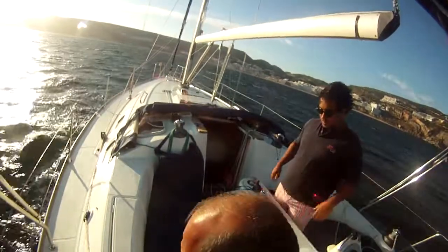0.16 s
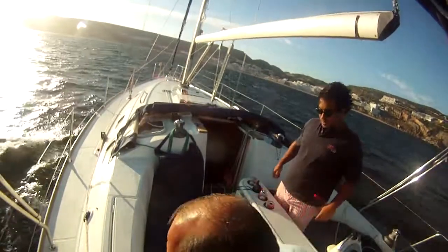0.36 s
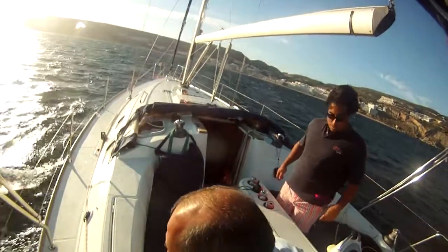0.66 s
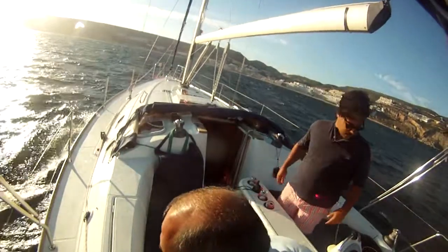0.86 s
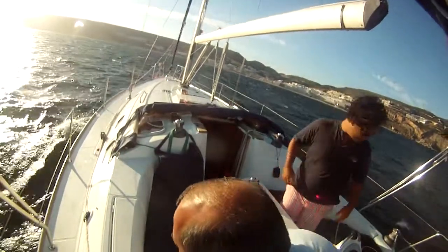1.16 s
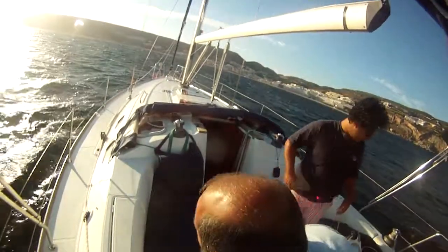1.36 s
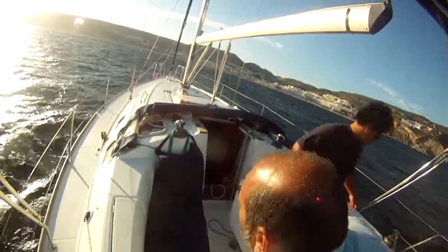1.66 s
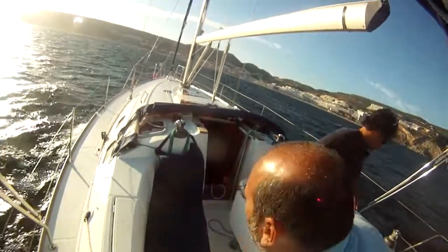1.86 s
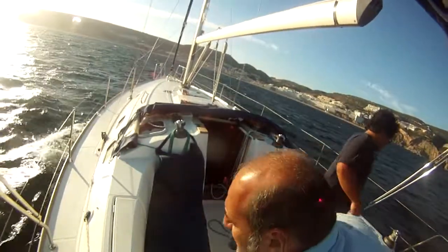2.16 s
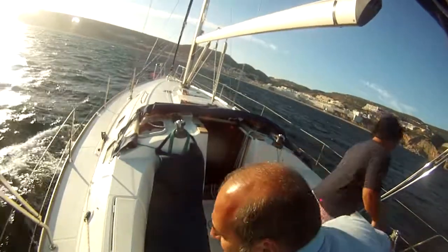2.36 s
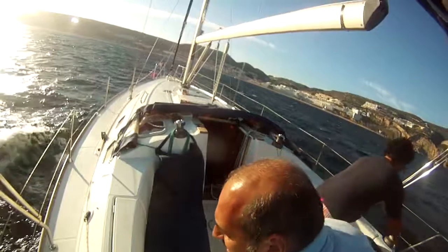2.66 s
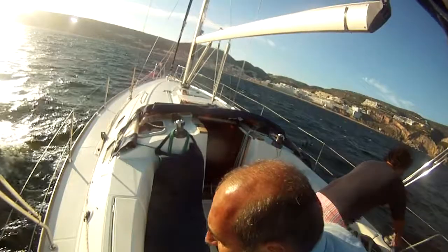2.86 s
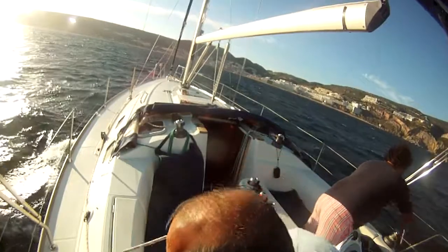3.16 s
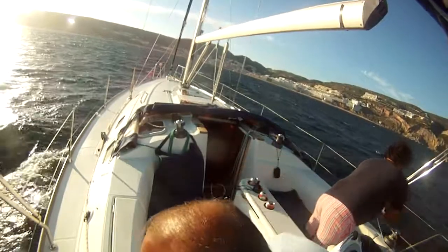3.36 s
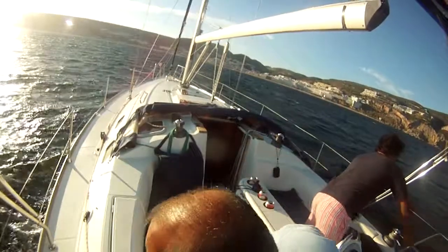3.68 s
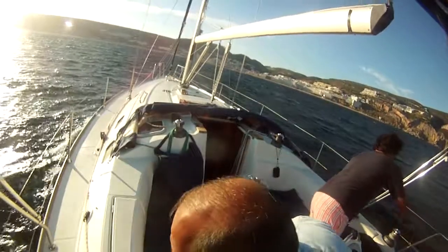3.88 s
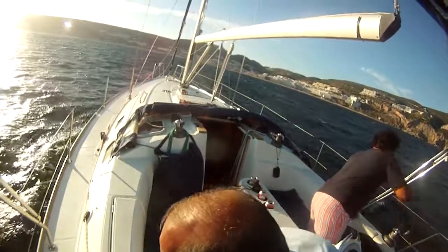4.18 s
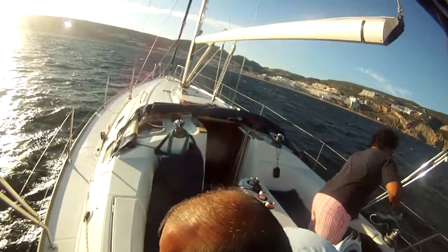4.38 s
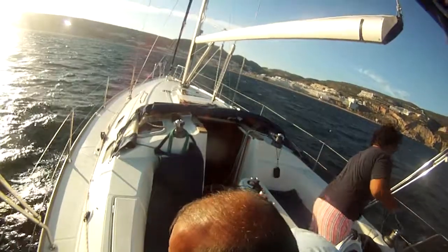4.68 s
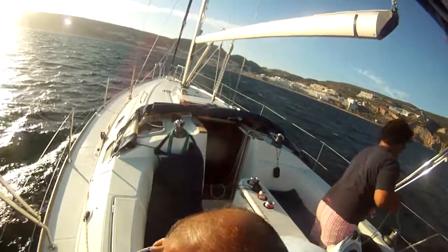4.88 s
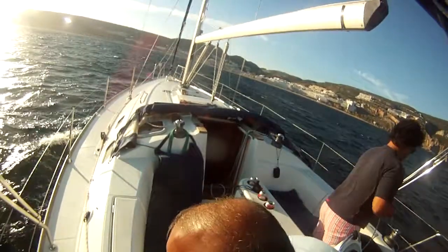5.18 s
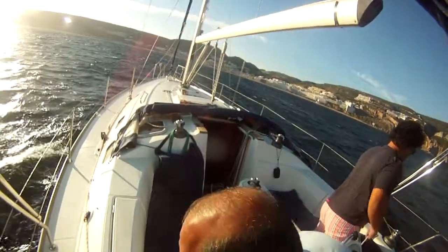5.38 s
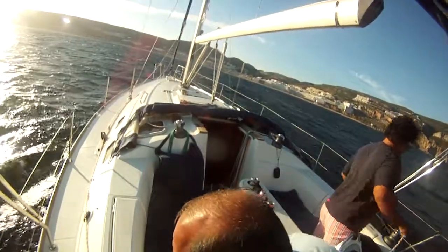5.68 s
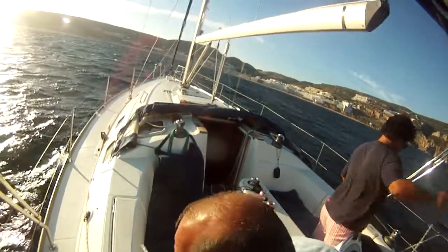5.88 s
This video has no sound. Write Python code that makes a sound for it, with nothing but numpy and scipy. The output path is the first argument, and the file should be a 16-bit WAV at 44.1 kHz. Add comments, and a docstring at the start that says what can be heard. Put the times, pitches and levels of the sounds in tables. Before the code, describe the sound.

A boat's diesel engine runs for the whole six seconds with a loud, low hum and rumble. The hull drones along in slow pulses, and from about 2 seconds the propeller adds a stronger throbbing beat. Small waves wash along the side, with soft hissing splashes near the start and more often from 4.7 seconds on. A loose fitting buzzes and rattles thinly underneath, giving dull little knocks at about 2, 3.1, 5.2 and 5.8 seconds. From 1.6 to 2 seconds something scrapes with a ringing rasp and thin, high squeaks. Around 3.5 seconds deck gear gives a sharp, loud double snap surrounded by lighter clicks, and one more small snap follows near 4.9 seconds. Everything is heard close, from the open cockpit, through a microphone in a hard case that makes it slightly boxy, with a faint metallic edge in the treble.

```python
"""In the cockpit of a sailing yacht that motors through small, choppy waves.
A three-cylinder diesel hums and beats against the propeller blades, and churned water makes the hull
drone. Waves wash past and a loose fitting buzzes. Something scrapes briefly and deck gear snaps.
It is all heard by a camera in a hard case: the case rings, and the camera's slow sampling
mirrors the sound into the treble."""
import sys
import numpy as np
from scipy import signal
from scipy.fft import rfft, irfft, next_fast_len
from scipy.io import wavfile
from scipy.ndimage import map_coordinates

SR = 44100
rng = np.random.default_rng(int(sys.argv[2]) if len(sys.argv) > 2 else 0)


def put_to_file(sound):
    """Save the sound as 16-bit audio at rate SR, in the file named by the first command-line argument."""
    columns = np.atleast_2d(sound).T  # one column per channel
    safe = np.clip(columns, -1, 1)
    whole_steps = np.round(safe * 32767)
    wavfile.write(sys.argv[1], SR, whole_steps.astype(np.int16))


N = 265923

# how the boat is driven: (time [s], engine speed [turns/s], propeller speed [turns/s], blade thump [dB])
DRIVE = [(0.0, 38, 15.5, -43), (0.75, 38.9, 16.3, -38.5), (1.5, 38.5, 16.2, -36.5),
         (2.25, 39.5, 16.1, -24.5), (3.0, 37.6, 17.7, -24), (3.75, 37.2, 17.3, -21.5),
         (4.5, 38.26, 16.27, -28.5), (5.25, 39.9, 15.5, -24), (6.0, 36.4, 17.9, -28.5)]
# engine hum; the cylinders fire 1.5 times a turn: (pitch [times engine speed], level [dB])
ENGINE_TONES = [(1, -30), (1.5, -17)]
# the three blades: (pitch [times propeller speed], level against the blade thump [dB])
BLADE_TONES = [(3, -1.5), (6, -24.5)]
# engine tones in the hull: (pitch [times engine speed], level against the churning [dB])
HULL_TONES = [(5, -7.5), (5.5, -11.5)]
# slow rise and fall of the hull drone and of the water: (time [s], relative level [dB])
DRONE_LEVEL = [(0.0, -20.5), (1.27, -22.0), (2.48, -16.5), (2.55, -23), (2.85, -20), (3.15, -26),
               (3.6, -17.5), (3.75, -26), (3.9, -19.5), (4.35, -23.5), (4.65, -20.5), (6.0, -20.5)]
WASH_LEVEL = [(0.0, -35.5), (1.43, -38.5), (1.65, -33.5), (2.17, -32), (2.4, -32.5), (2.48, -35),
              (2.62, -32.3), (2.92, -33.5), (3.0, -37), (3.38, -33.5), (3.83, -36), (3.98, -33.5),
              (4.12, -37.5), (4.58, -38), (4.65, -32.5), (5.03, -36.5), (6.0, -32.1)]
# small waves breaking on the hull: (time of the crest [s], level [dB], length [s])
SPLASHES = [(0.277, -42.5, 0.29), (0.663, -41.5, 0.14), (2.35, -45, .2), (2.7, -42, 0.21),
            (3.62, -41.5, 0.33), (4.18, -44.5, 0.26), (4.786, -37.5, .3), (5.0, -41, 0.17),
            (5.24, -38, .14), (5.55, -38, 0.26), (5.98, -40, 0.41)]
# sharp snaps of deck gear, dull knocks of the fitting: (time [s], level [dB], time to fade 60 dB [s])
SNAPS = [(3.354, -24.5, 0.04), (3.391, -30, 0.027), (3.4572, -9, 0.051), (3.4675, -8.2, 0.04),
         (3.477, -28.5, 0.024), (3.521, -31, .03), (4.853, -25.5, 0.047)]
KNOCKS = [(2.023, -23, 0.064), (3.111, -22.5, 0.03), (5.201, -22, 0.066), (5.764, -23.5, 0.15)]

# how each noise is spread from bass to treble: (frequency [Hz], relative level [dB])
DRONE_COLOUR = [(40, -23.5), (100, -5), (150, 4), (210, -1), (280, -7.5), (420, -23.5), (900, -33),
                (2500, -66)]
RUMBLE_COLOUR = [(10, -36.5), (25, -25), (40, -5), (62, 1), (73, -6.5), (86, -12), (110, -19), (200, -9),
                 (400, -65.5)]
SNAP_COLOUR = [(300, -27), (780, -23), (950, -9.5), (1400, -15), (1750, -5), (2250, 1), (2900, -19),
               (3650, -5.5), (4100, -13), (4600, -19.5), (6000, -33)]
SCRAPE_COLOUR = [(400, -25), (950, -4.5), (1300, -11), (1500, -13), (1750, -17), (2150, 0.5), (2450, -6.5),
                 (2900, -16), (3600, -15.5), (4500, -21.5), (6000, -22.5)]
SQUEAK_COLOUR = [(1000, -28.0), (5000, -11)]
WASH_COLOUR = [(100, -26.5), (280, 0), (450, -1.5), (850, -4), (1300, -11.5), (2000, -19), (3000, -37),
               (6000, -73.5)]
SPRAY_COLOUR = [(400, -23.5), (1000, -4.5), (1600, -3.5), (2550, -0.5), (2900, -13), (3400, -8.5),
                (4300, -17.5), (5200, -18.5), (6000, -31)]
BUZZ_COLOUR = [(400, -28.5), (850, -19.5), (990, -2), (1150, -15), (1600, -20.5), (2120, -15),
               (2600, -26.5), (5000, -43)]
RATTLE_COLOUR = [(1500, -27.5), (2100, -1.5), (2800, -24.5)]
# the pitches at which each thing rings: (frequency [Hz], width [Hz], boost [dB])
HULL_RING = [(142, 30, 6.5), (187.1, 37.5, 25), (240.7, 20, 7), (328.3, 34, 10), (538.7, 153, 16),
             (697, 46, 10), (755, 36, 4)]
CASE_RING = [(989, 117, 11.5), (1238, 120, 5), (2126, 160, 8.5), (2657, 94, 9), (3737, 153, 8.5)]
GEAR_RING = [(1045, 210, 5.5), (2180, 117, 11.5), (3730, 150, 3)]
SCRAPE_RING = [(2021, 73, 19), (3640, 56, 5), (4090, 150, 13.5)]
SQUEAK_RING = [(5296, 130, 33)]
RATTLE_RING = [(2093, 136, 20.5)]

FIRINGS_PER_TURN, BLADES = 1.5, 3
SCRAPE_START_S, SCRAPE_END_S, SLIPS_PER_S = 1.625, 2.01, 47


def engine(engine_turns):
    """The diesel hums: one tone from its turning shaft, a louder one from its firing cylinders."""
    return tones(engine_turns, ENGINE_TONES, waver_db=0)


def propeller(propeller_turns, thump_db):
    """The blades thump at nearly the engine's firing rate, so the two sounds beat together."""
    return amp(thump_db) * tones(propeller_turns, BLADE_TONES, waver_db=2)


def hull_drone(engine_turns, propeller_turns):
    """Water churned by the propeller shakes the hull panels, which also hum with the engine."""
    blade_passes = BLADES * propeller_turns
    firings = FIRINGS_PER_TURN * engine_turns
    churn = bursts(propeller_turns, sharpness=0.39) * np.exp(0.4 * np.cos(2 * np.pi * blade_passes))
    drone = unit(colour(churn, DRONE_COLOUR, HULL_RING))
    drone += tones(engine_turns, HULL_TONES, waver_db=1.5)
    level_db = curves(DRONE_LEVEL)[0] - 3.4 + throb() + 1.88 * wobble(15)
    beat_db = 2.07 * np.cos(2 * np.pi * (firings - blade_passes))  # they drift in and out of step
    return amp(level_db + beat_db) * steady(drone, span_s=0.28)


def throb(rate_hz=0.97, deep_dip_s=0.91):
    """The drone's slow pulse, in dB: a deep dip every cycle and a shallow one halfway."""
    phase = 2 * np.pi * rate_hz * (np.arange(N) / SR - deep_dip_s)
    return -1.83 * np.cos(phase) - 1.87 * np.cos(2 * phase)


def rumble(level_db=-27):
    """A low, even noise from the machinery lies under the hum."""
    return amp(level_db) * unit(colour(rng.standard_normal(N), RUMBLE_COLOUR))


def panel_hum(propeller_turns, thump_db):
    """One hull panel hums at three times the blade rate; it grows with the thump and swells once."""
    hum = amp(-34 + 0.35 * (thump_db - thump_db.mean()) + 3 * wobble(8))
    swell = amp(-24) * fade(start_s=0.24, end_s=0.74, rise_s=0.14, fall_s=0.14)
    tone = np.sqrt(2) * np.sin(2 * np.pi * 3 * BLADES * propeller_turns)
    return np.hypot(hum, swell) * tone


def gear_snaps():
    """Hard hits make the deck gear and the camera case ring for an instant."""
    return hits(SNAPS, SNAP_COLOUR, CASE_RING + GEAR_RING, rise_s=0.00095)


def scrape(level_db=-32):
    """Something sticks and slips in quick, uneven jerks, making a ringing rasp."""
    slips = unit(rng.standard_normal(N) * amp(1.5 * wobble(170)))
    rasp = steady(colour(slips, SCRAPE_COLOUR, CASE_RING + SCRAPE_RING), span_s=0.072)
    pressure = fade(SCRAPE_START_S, SCRAPE_END_S, rise_s=0.09, fall_s=0.1)
    return pressure * amp(level_db + 2.5 * wobble(SLIPS_PER_S)) * rasp


def squeaks(level_db=-40.5, spread_db=6.5, fade_s=0.071):
    """During the scrape, slips set off thin chirps, uneven in timing and size."""
    chirps = []
    for time_s in np.arange(SCRAPE_START_S, SCRAPE_END_S - 0.025, 1 / SLIPS_PER_S):
        late, size = rng.uniform(-1, 1, 2)
        chirps.append((time_s + 0.39 * late / SLIPS_PER_S, level_db + spread_db * size, fade_s))
    return hits(chirps, SQUEAK_COLOUR, SQUEAK_RING, rise_s=0.003)


def wash(wash_db):
    """The bow wave rushes along the hull, loudest when the boat leans into a wave."""
    water = drops(per_s=200, spread_db=6.5, strength=0.52)
    rush = unit(colour(water, WASH_COLOUR, HULL_RING + CASE_RING))
    return amp(wash_db - 3 + 2 * wobble(16)) * rush


def spray(surge_db):
    """Water breaks into a hiss of drops that grows a little with the wash and flares at each splash."""
    water = drops(per_s=350, spread_db=5, strength=0.63)
    hiss = unit(colour(water, SPRAY_COLOUR, CASE_RING))
    power = amp(-44 + 0.22 * surge_db) ** 2 + splash_power()
    return np.sqrt(power) * amp(1.63 * wobble(25)) * hiss


def splash_power(rise_share=0.48):
    """The power of the small breaking waves: each swells to its crest and drains away."""
    t, power = np.arange(N) / SR, np.zeros(N)
    for crest_s, db, length_s in SPLASHES:
        width_s = length_s * np.where(t < crest_s, rise_share, 1 - rise_share)
        power += amp(db) ** 2 * np.exp(-((t - crest_s) / width_s) ** 2)
    return power


def loose_fitting(engine_turns, surge_db):
    """A loose fitting buzzes and rattles thinly as the engine fires, and now and then it knocks."""
    firings = FIRINGS_PER_TURN * engine_turns
    buzz = steady(colour(bursts(firings, sharpness=0.3), BUZZ_COLOUR, CASE_RING), span_s=0.24)
    buzz_db = -40 + 1.22 * surge_db + 2.6 * wobble(14)
    shaking = bursts(firings, sharpness=0.83) * amp(4.7 * wobble(23.99))
    rattle = unit(colour(shaking, RATTLE_COLOUR, RATTLE_RING))
    knocks = hits(KNOCKS, BUZZ_COLOUR, CASE_RING, rise_s=0.0024)
    return amp(buzz_db) * buzz + amp(-49) * rattle + knocks


def tones(turns, rows, waver_db):
    """Tones at multiples of a shaft's speed, each wavering in level by about waver_db."""
    sound = np.zeros(N)
    for multiple, db in rows:
        gain = amp(db + waver_db * wobble(4.84))
        sound += gain * np.sqrt(2) * np.cos(2 * np.pi * (multiple * turns + rng.random()))
    return sound


def bursts(cycles, sharpness):
    """Noise that flares once a cycle."""
    return unit(rng.standard_normal(N) * np.exp(sharpness * np.cos(2 * np.pi * cycles)))


def drops(per_s, spread_db, strength):
    """Noise mixed with tiny impacts of uneven size."""
    lands = rng.random(N) < per_s / SR
    size = amp(spread_db * np.clip(rng.standard_normal(N), -2, 2)) * rng.choice([-1, 1], N)
    return rng.standard_normal(N) + strength * unit(lands * size)


def hits(rows, shape, rings, rise_s):
    """Each hit is a ringing noise that swells quickly and dies away."""
    t = np.arange(SR // 4) / SR
    loudness = np.zeros(N + len(t))
    for time_s, db, fade_s in rows:
        loudness[round(time_s * SR):][:len(t)] += (1 - np.exp(-t / rise_s)) * amp(db - 60 * t / fade_s)
    ringing = steady(colour(rng.standard_normal(N), shape, rings), span_s=0.01)
    return loudness[:N] * ringing


def colour(noise, shape, rings=()):
    """Filter a noise with a smooth bass-to-treble shape and ringing peaks on top."""
    size = 2 * next_fast_len(N // 2 + SR // 4)
    hz = np.fft.rfftfreq(size, 1 / SR)
    shape_hz, shape_db = np.transpose(shape)
    db = np.interp(np.log(hz + 1), np.log(shape_hz), shape_db)
    db += sum(boost / (1 + (2 * (hz - centre) / width) ** 2) for centre, width, boost in rings)
    # these three lines make the filter ring after each sound, never before it
    cepstrum = irfft(np.log(unit(amp(db))))
    cepstrum[1:size // 2] *= 2
    cepstrum[size // 2 + 1:] = 0
    running = np.pad(noise, (size - N, 0), "wrap")  # already ringing at time zero
    return irfft(rfft(running) * np.exp(rfft(cepstrum)))[-N:]


def steady(x, span_s):
    """Even out the level over span_s seconds, keeping the faster flutter."""
    window = signal.windows.hann(int(span_s * SR))
    padded = np.pad(x ** 2, len(window), "reflect")
    power = signal.fftconvolve(padded, window / window.sum(), "same")[len(window):][:N]
    return x / np.sqrt(np.abs(power) + 1e-12)


def fade(start_s, end_s, rise_s, fall_s):
    """A volume curve that rises, holds at 1 and falls."""
    t = np.arange(N) / SR
    return np.clip(np.minimum((t - start_s) / rise_s, (end_s - t) / fall_s), 0, 1)


def wobble(per_s):
    """A smooth curve through per_s random values a second."""
    points = rng.standard_normal(int(N * per_s / SR) + 4)
    return map_coordinates(points, [np.arange(N) * per_s / SR])


def curves(rows):
    """Turn each table column after the time into one value per sample."""
    times, *columns = np.transpose(rows)
    return [np.interp(np.arange(N) / SR, times, column) for column in columns]


def amp(db):
    """Turn decibels into a gain."""
    return 10 ** (np.asarray(db) / 20)


def unit(x):
    """Scale to an average power of 1."""
    return x / np.sqrt(np.mean(x ** 2) + 1e-20)


def scene():
    """Engine and propeller shake the boat; the spray and the buzz rise and fall with the wash."""
    engine_hz, propeller_hz, thump_db = curves(DRIVE)
    engine_turns = np.cumsum(engine_hz) / SR
    propeller_turns = np.cumsum(propeller_hz) / SR
    wash_db, = curves(WASH_LEVEL)
    surge_db = wash_db - wash_db.mean()  # how far the wash is above its average
    machinery = engine(engine_turns) + propeller(propeller_turns, thump_db) + rumble()
    hull = hull_drone(engine_turns, propeller_turns) + panel_hum(propeller_turns, thump_db)
    deck = gear_snaps() + scrape() + squeaks()
    sea = wash(wash_db) + spray(surge_db)
    return (machinery + hull + deck + sea + loose_fitting(engine_turns, surge_db))[None]


def record(dry, cutoff_hz=5800, hold_hz=12000, top_hz=15300):
    """The camera samples slowly and holds each value, which mirrors the sound around hold_hz."""
    margin, size = SR // 8, 2 * next_fast_len(N // 2 + SR // 4)
    hz = np.fft.rfftfreq(size, 1 / SR)
    padded = np.pad(dry[0], margin, "reflect", reflect_type="odd")
    dulled = irfft(rfft(padded, size) / np.sqrt(1 + (hz / cutoff_hz) ** 50))
    mirrored = dulled * (1 + 2 * np.cos(2 * np.pi * hold_hz * np.arange(size) / SR))
    held = irfft(rfft(mirrored) * np.sinc(hz / hold_hz) * (hz < top_hz))  # holding softens the treble
    return held[None, margin:margin + N]


dry = scene()
out = record(dry)
put_to_file(out)
```